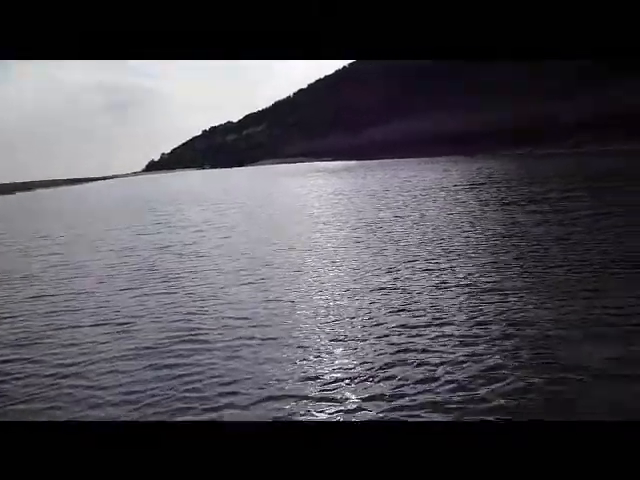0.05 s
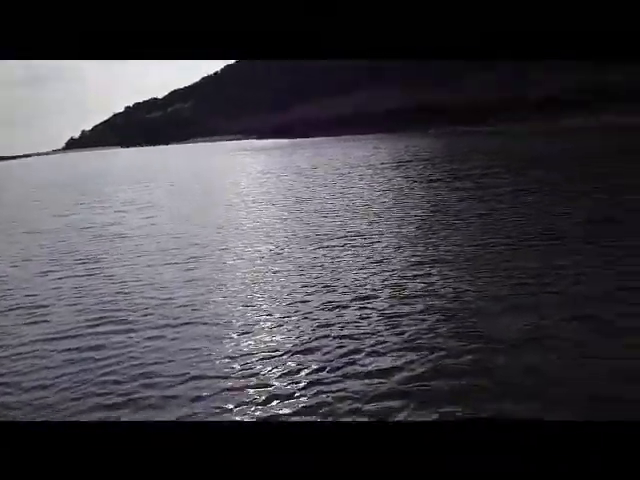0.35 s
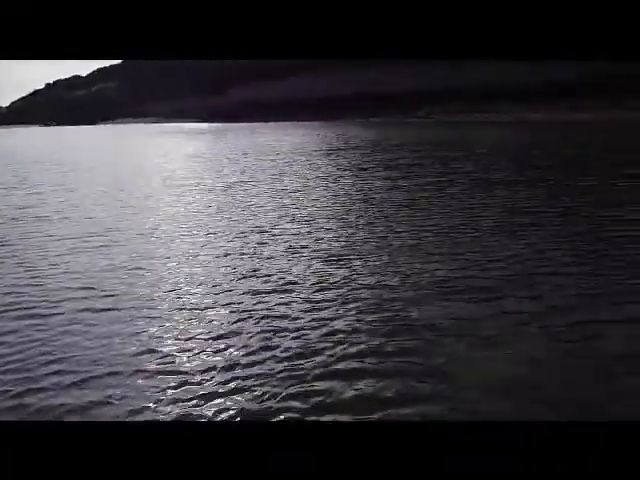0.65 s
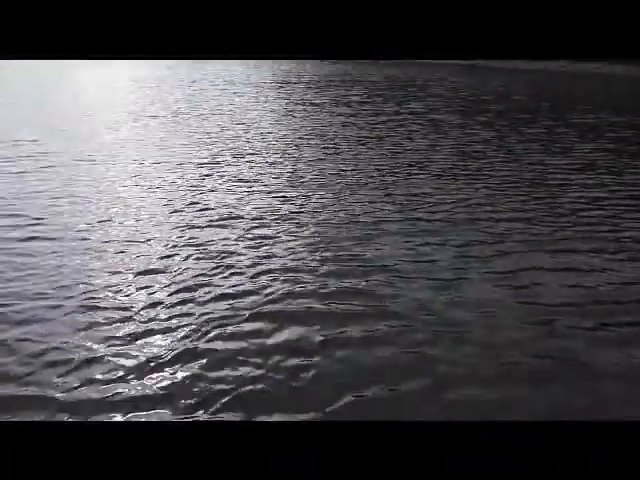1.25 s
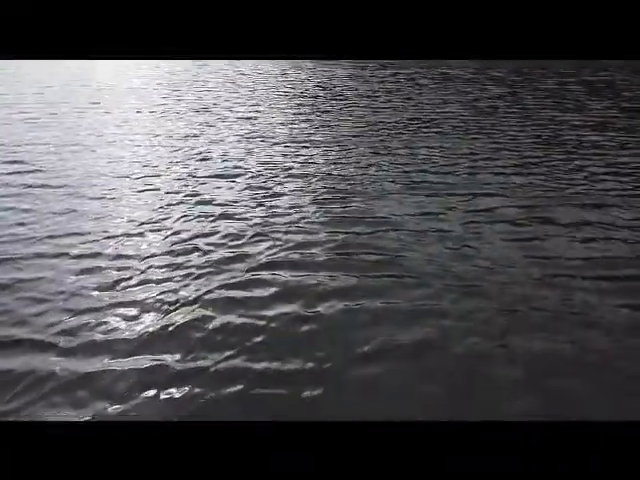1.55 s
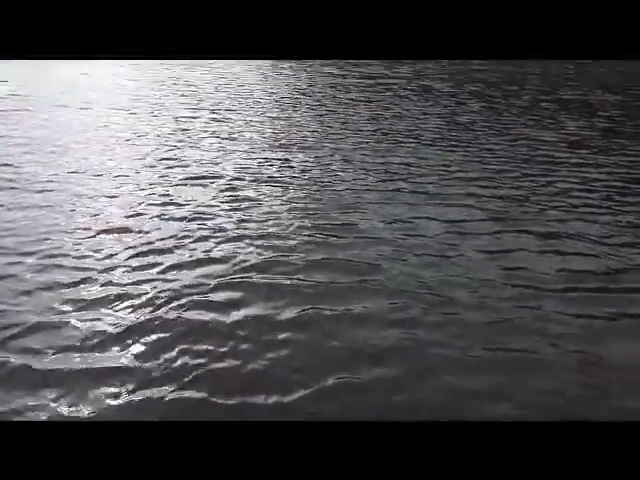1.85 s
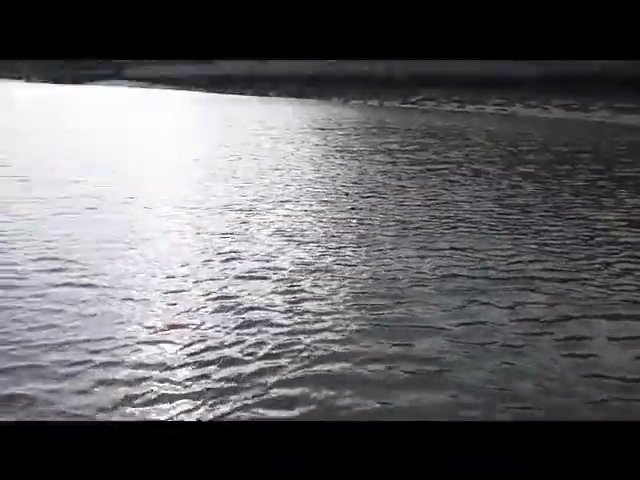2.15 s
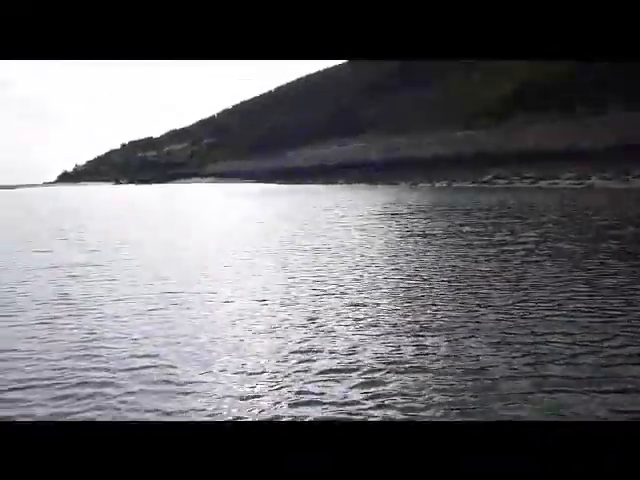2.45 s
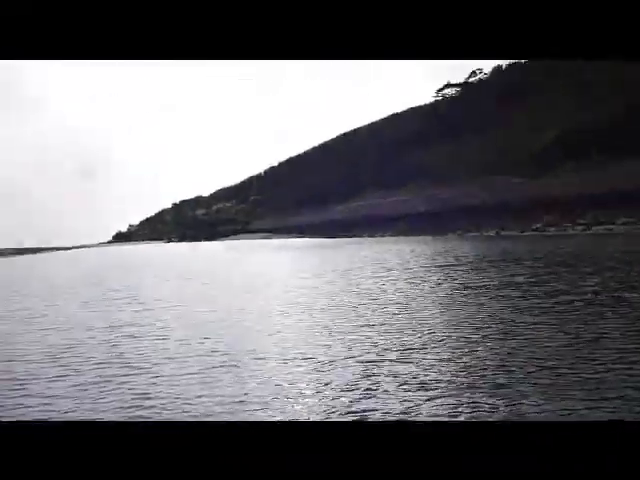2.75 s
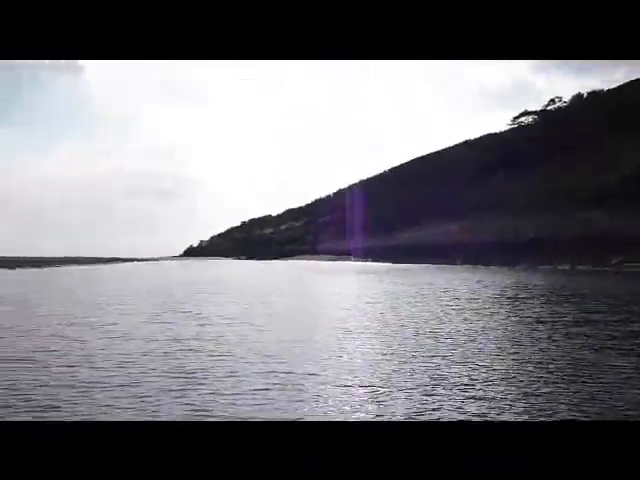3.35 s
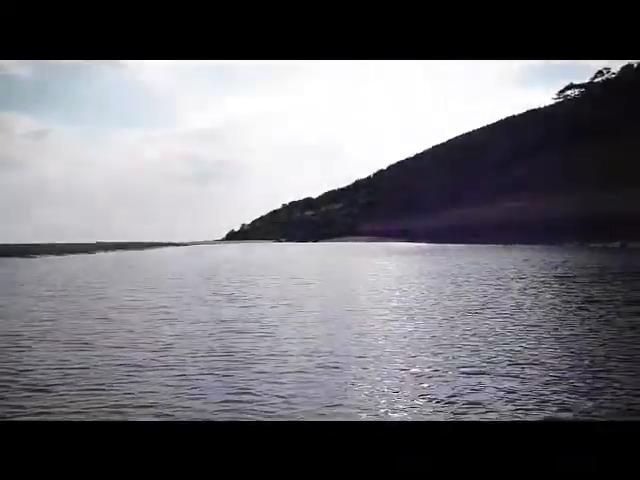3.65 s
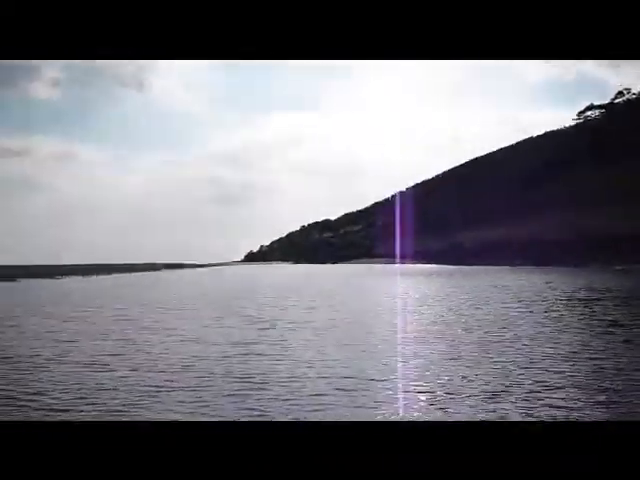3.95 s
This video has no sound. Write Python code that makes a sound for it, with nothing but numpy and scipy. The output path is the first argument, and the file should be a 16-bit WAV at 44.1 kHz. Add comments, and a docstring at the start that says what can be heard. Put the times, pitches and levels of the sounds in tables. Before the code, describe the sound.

A gull yelps hoarsely twice at the start, over softly rushing water and faint ripples. A loud, hollow knock rings through a boat's hull at 0.8 seconds, with softer ones near 2.3 and 3.5. The gull gives falling cries at about 1.7 and 3.1 seconds, each ending in a croak and echoing faintly. Wind puffs bump the microphone on and off, and a small plop comes near 3.7.

```python
"""A gull over a wide river, heard from a small boat: two hoarse yelps, then two long falling cries.
Its harmonics slide through throat resonances; each cry starts hoarse and ends in a croak.
The hillside returns a faint echo of the bird. Knocks set the hollow hull ringing, small ticks sound,
and puffs of air bump the microphone. Water rushes all around, ripples trap ringing bubbles,
and a faint low hum fades away."""
import sys
import numpy as np
from scipy import signal
from scipy.fft import rfft, irfft, next_fast_len
from scipy.io import wavfile
from scipy.ndimage import uniform_filter1d, map_coordinates

SR = 44100
rng = np.random.default_rng(int(sys.argv[2]) if len(sys.argv) > 2 else 0)


def waveform_to_disk(signal):
    """Save audio, clipped to [-1, 1], as 16-bit WAV at the path in sys.argv[1]."""
    frames = np.transpose(np.atleast_2d(signal))
    scaled = np.clip(frames, -1, 1) * 32767
    samples = np.round(scaled).astype(np.int16)
    wavfile.write(sys.argv[1], SR, samples)


N = 176400
TIME_S = np.arange(N) / SR


def amp(db):
    return 10 ** (np.asarray(db) / 20)


def unit_rms(x):
    return x / np.sqrt(np.mean(x ** 2) + 1e-20)


def at_hz(points, hz):
    """Interpolate (frequency, value) points on a log axis."""
    freqs, values = np.transpose(points)
    return np.interp(np.log(hz + 1), np.log(freqs + 1), values)


def curves(rows):
    """One value per sample for each column after the time."""
    times, *columns = np.transpose(rows)
    return [np.interp(TIME_S, times, column) for column in columns]


def wobble(rate_hz, size=N):
    """Smooth random curve, rate_hz knots a second."""
    knots = rng.standard_normal(int(size * rate_hz / SR) + 4)
    return map_coordinates(knots, [np.arange(size) * rate_hz / SR])


def wavering_phase(hz, depth, rate_hz, size=N):
    """Running phase of a pitch with random relative deviation."""
    return 2 * np.pi * np.cumsum(hz * (1 + depth * wobble(rate_hz, size))) / SR


def noise(spectrum, size=N):
    """Coloured noise, rms 1."""
    n_fft = next_fast_len(size + 8192)
    gain = amp(at_hz(spectrum, np.fft.rfftfreq(n_fft, 1 / SR)))
    return unit_rms(irfft(rfft(rng.standard_normal(n_fft)) * gain, n_fft)[:size])


def snap(spectrum, t60_s):
    """Short decaying noise burst."""
    t = np.arange(SR // 10) / SR
    return noise(spectrum, len(t)) * amp(-60 * t / t60_s)


def gate(rows, fade_s):
    """1 from the first row's time to the last, with fades centred on both."""
    inside_s = np.minimum(TIME_S - rows[0][0], rows[-1][0] - TIME_S)
    return np.sin(np.pi / 2 * np.clip(inside_s / fade_s + .5, 0, 1)) ** 2


def add(out, start_s, x):
    i = max(round(start_s * SR), 0)
    out[i:i + len(x)] += x[:N - i]


# Water rush (frequency [Hz], gain [dB])
RUSH_SPECTRUM = [(25, -5), (60, 3.5), (95, -3), (220, -6.5), (400, -15), (900, -13), (1400, -18),
                 (2000, -25), (3000, -30.5), (6500, -35.5), (8000, -47.5)]
# Rush envelope (time [s], level [dB])
RUSH_ENVELOPE = [(0, -46.5), (1.3, -49), (2.6, -47.5), (3.0, -49), (4, -47.5)]
# Fine hiss (frequency [Hz], gain [dB])
HISS_SPECTRUM = [(800, -16), (2500, -2), (4000, -7), (6000, -2.5), (8000, -17)]
# Hiss swells (centre [s], level [dB], half width [s])
HISS_SWELLS = [(0.591, -60.5, 0.098), (1.99, -59.5, 0.17), (3.95, -65.5, 0.2)]


def river(patch_db=2.5, hollow_hz=942, hollow_width_hz=180, hollow_db=-11):
    """Open water rushes in shifting patches, with a wandering resonance and swells of hiss."""
    bins = signal.stft(noise(RUSH_SPECTRUM), nperseg=512)[2]
    patches = uniform_filter1d(rng.standard_normal(bins.shape), size=4, axis=0)
    patches = unit_rms(uniform_filter1d(patches, size=10, axis=1))
    rush = unit_rms(signal.istft(bins * amp(patch_db * patches), nperseg=512)[1][:N])
    phase = 2 * np.pi * np.cumsum(hollow_hz * np.exp(.08 * wobble(8.2))) / SR
    hollow = unit_rms(wobble(hollow_width_hz) * np.cos(phase) + wobble(hollow_width_hz) * np.sin(phase))
    water = (rush + amp(hollow_db) * hollow) * amp(curves(RUSH_ENVELOPE)[0])
    swells = sum(amp(db) * np.exp(-.5 * ((TIME_S - centre_s) / width_s) ** 2)
                 for centre_s, db, width_s in HISS_SWELLS)
    return water + noise(HISS_SPECTRUM) * swells


# Hum envelope (time [s], level [dB])
HUM_ENVELOPE = [(.8, -53), (1.3, -65), (2, -86)]


def hum(hz=133):
    """A wavering low sine fades away."""
    phase = wavering_phase(hz, depth=.011, rate_hz=7.7)
    return np.sqrt(2) * np.sin(phase) * amp(curves(HUM_ENVELOPE)[0])


# Two yelps, two cry onsets; a list each (time [s], pitch [Hz], level [dB], roughness [0-1])
YELPS_AND_ONSETS = [
    [(.018, 396.5, -49.5, .5), (.032, 429.7, -31, 0.3), (.04, 438, -45, .3), (.045, 502, -41.5, 0.1),
     (.056, 507, -37, 0.14), (.072, 468, -49, 0.4), (.097, 405, -51, 0.65)],
    [(.213, 405, -43.5, 0.76), (.229, 450.6, -37.5, .3), (.243, 487.3, -37.5, 0.14),
     (.259, 480, -36.5, 0.2), (.274, 418, -50.5, .5), (.286, 383, -47, .7)],
    [(1.684, 474.7, -55, 0.8), (1.702, 542.5, -44.5, 0.37), (1.712, 615, -43.5, 0.37),
     (1.739, 640, -48, 0.88)],
    [(3.1, 526, -55, 0.7), (3.117, 587, -46.5, 0.25), (3.144, 597, -44.5, 0.77)],
]
# Open throat (frequency [Hz], gain [dB])
THROAT_OPEN = [(300, -30), (650, -10.5), (950, -6.5), (1280, -0.5), (1480, -11.5), (1760, -1.5), (1930, 0),
               (2600, -8), (2850, -19), (3480, -8), (3750, -18.5), (8000, -39.5)]
# Croak ending each cry; a list each (time [s], pitch [Hz], level [dB], roughness [0-1])
END_CROAKS = [
    [(1.884, 358, -46, 0.98), (1.936, 311, -48.5, 0.35)],
    [(3.346, 340, -41, 0.49), (3.388, 316, -46, 0.77)],
]
# Half-shut throat (frequency [Hz], gain [dB])
THROAT_HALF_SHUT = [(300, -27), (700, -1.5), (1000, 12), (1350, 0.5), (7500, -46)]


def gull_hoarse():
    """The voice breaks into a low register: the throat shapes rich harmonics and pulsing noise."""
    out = np.zeros(N)
    for notes, throat in [(YELPS_AND_ONSETS, THROAT_OPEN), (END_CROAKS, THROAT_HALF_SHUT)]:
        for rows in notes:
            edges = gate(rows, fade_s=.008)
            on = edges > 0
            hz, db, rough = (curve[on] for curve in curves(rows))
            phase = wavering_phase(hz, depth=.008, rate_hz=400, size=len(hz))
            gains = amp([at_hz(throat, k * hz) for k in range(1, 18)])
            tone = sum(gain * np.sin(k * phase + rng.uniform(0, 2 * np.pi))
                       for k, gain in enumerate(gains, 1))
            tone = unit_rms(tone / np.linalg.norm(gains, axis=0))
            rasp = unit_rms(noise(throat, len(hz)) * (1 + np.cos(phase)))
            out[on] += (np.sqrt(1 - rough ** 2) * tone + rough * rasp) * amp(db) * edges[on]
    return out


def valley(direct, reflection_db=-25.5, blur_hz=264.6):
    """Direct sound, scatter off the water and a late echo from the hill."""
    t, out = np.arange(SR) / SR, direct.copy()
    blurred = direct * unit_rms(wobble(blur_hz))  # moving air and water blur the echo's pitch
    for sound, delay_s, t60_s in [(direct, .01, .94), (blurred, .28, 1.2)]:
        tail = rng.standard_normal(SR) * amp(-60 * t / t60_s)
        add(out, delay_s, amp(reflection_db) * signal.fftconvolve(sound, tail / np.linalg.norm(tail)))
    return out


# Air puffs on the microphone (centre [s], level [dB], pitch [Hz])
AIR_PUFFS = [(0.098, -29, 159), (0.115, -25.5, 176), (.132, -33, 119), (0.173, -36, 114),
             (0.441, -35.5, 186), (0.529, -35, 169), (1.393, -35.5, 131), (1.506, -24.5, 124.6),
             (1.555, -17, 146), (1.571, -31.5, 169), (1.896, -17, 160), (1.911, -21.5, 116),
             (2.429, -25.5, 140), (2.448, -26.5, 122), (2.472, -20.5, 138), (2.512, -24.5, 240),
             (2.533, -23.5, 181), (3.429, -22.5, 182), (3.535, -33, 113)]
# Turbulence (frequency [Hz], gain [dB])
WAKE_SPECTRUM = [(25, -21), (80, 5.5), (220, 5.5), (400, -4), (4000, -88)]


def air_puffs(width_cycles=.33, wake_stretch=3.9, wake_gain=.49):
    """Each eddy is a low pressure swing of one or two cycles inside longer turbulence."""
    out, n = np.zeros(N), SR // 6
    t = (np.arange(n) - n / 2) / SR
    for centre_s, db, hz in AIR_PUFFS:
        widths = t * hz / width_cycles
        bell = 1 / np.cosh(widths)
        swing = unit_rms(bell * np.sin(2 * np.pi * (hz * t + rng.random())))
        wake = unit_rms(np.exp(-.5 * (widths / wake_stretch) ** 2) * noise(WAKE_SPECTRUM, n))
        puff = unit_rms(swing + wake_gain * wake) * np.sqrt(np.mean(bell ** 2))
        add(out, centre_s + t[0], amp(db) * puff)
    return out


def bubble(hz, db, life_cycles=6.9, rise=.041):
    """One bubble rings briefly and rises in pitch."""
    cycles = hz * np.arange(SR // 10) / SR
    age = cycles / life_cycles
    phase = 2 * np.pi * cycles * (1 + rise * np.tanh(age / 2))
    return amp(db) * np.sin(phase) * np.tanh(cycles) * np.exp(-2 * age)


def ripples(count=36, median_hz=1465, log_spread=.83, median_db=-65):
    """Ripples trap small bubbles, the smaller the fainter; a larger one plops beside the boat."""
    out = np.zeros(N)
    starts_s = rng.uniform(0, N / SR, count)
    for start_s, (pitch_draw, level_draw) in zip(starts_s, rng.standard_normal((count, 2))):
        hz = median_hz * np.exp(log_spread * np.clip(pitch_draw, -2, 2))
        add(out, start_s, bubble(hz, median_db + 2 * level_draw) * np.sqrt(median_hz / hz))
    add(out, 3.668, bubble(hz=390, db=-39.5))
    return out


# Small ticks: a lone one, then one leading into the first hull knock (time [s], level [dB])
TICK_HITS = [(0.73, -43.5), (0.842, -41.5)]
# Tick noise (frequency [Hz], gain [dB])
TICK_SPECTRUM = [(500, 6.5), (3500, -3), (5300, 3), (8000, -5)]


def ticks():
    """Each tick is a faint, bright burst."""
    out = np.zeros(N)
    for start_s, db in TICK_HITS:
        add(out, start_s, amp(db) * snap(TICK_SPECTRUM, t60_s=.028))
    return out


# Hull knocks (time [s], thud level [dB], sustain [ratio], crack level [dB])
HULL_KNOCKS = [(0.8448, -21, 1, -30), (2.335, -29.5, 0.82, -42.5), (2.3474, -40, 0.64, -60),
               (3.473, -32.5, 0.58, -55)]
# Hull modes (frequency [Hz], gain [dB], T60 at sustain 1 [s])
HULL_MODES = [(163.6, -16, 1.84), (234, -14.5, 1.3), (295.3, -9, 1.3), (324.4, -5, 0.96), (342.5, -7, 0.8),
              (585, 0.5, 0.27), (618, -5.5, 0.35), (695, -2.5, 0.32), (1293, -5.5, 0.13),
              (5180, -19, 0.059)]
# Thud noise (frequency [Hz], gain [dB])
THUD_SPECTRUM = [(50, -38), (150, 5), (300, 1.5), (700, -7), (1300, 3.5), (1800, -1.5), (2600, -19.5),
                 (8000, -44)]
# Thud decay (frequency [Hz], T60 at sustain 1 [s])
THUD_DECAY = [(150, 0.43), (330, 0.6), (700, 0.35), (1300, 0.062), (2500, 0.06), (7000, 0.02)]
# Crack noise (frequency [Hz], gain [dB])
CRACK_SPECTRUM = [(200, -15), (1000, -3), (2500, 10.5), (5300, 2.5), (8000, -7)]


def hull_knocks(push_hz=927, push_db=3.5, push_t60_s=.015, ring_db=-5, attack_s=.0023, crack_lag_s=.003):
    """Each knock gives a push, a crack, a dense thud whose treble dies first, and the hull's ring."""
    out, t = np.zeros(N), np.arange(SR) / SR
    for start_s, thud_db, sustain, crack_db in HULL_KNOCKS:
        bin_hz, age_s, bins = signal.stft(noise(THUD_SPECTRUM, SR), SR, nperseg=256)
        bin_t60_s = sustain * at_hz(THUD_DECAY, bin_hz)[:, None]
        thud = signal.istft(bins * amp(-60 * age_s / bin_t60_s), SR, nperseg=256)[1][:SR]
        ring = np.zeros(SR)
        for hz, db, t60_s in HULL_MODES:
            decay = amp(db + rng.normal() - 60 * t / (sustain * t60_s))
            ring += decay * np.sin(2 * np.pi * (hz * t + rng.random()) + wobble(35, SR))
        push = amp(push_db - 60 * t / push_t60_s) * np.sin(2 * np.pi * push_hz * t)
        body = (thud + sustain * amp(ring_db) * ring) * (1 - np.exp(-t / attack_s))
        add(out, start_s, amp(thud_db) * (push + body))
        add(out, start_s + crack_lag_s, amp(crack_db) * snap(CRACK_SPECTRUM, t60_s=.012))
    return out


# First cry, clear part (time [s], pitch [Hz], level [dB])
FIRST_CRY = [(1.716, 1866, -44.5), (1.738, 1831, -34), (1.768, 1718, -39), (1.79, 1657, -34),
             (1.826, 1620, -38), (1.858, 1500, -44.5), (1.878, 1450, -48)]
# Second cry, clear part (time [s], pitch [Hz], level [dB])
SECOND_CRY = [(3.139, 1784, -40), (3.154, 1787, -44), (3.2, 1658, -40), (3.255, 1576, -35.5),
              (3.306, 1430, -46), (3.337, 1306, -41.5), (3.346, 1260, -50)]
# Throat in the clear cries (frequency [Hz], gain [dB])
THROAT_CLEAR = [(1900, 1.5), (2600, -30), (2950, -7), (3080, -13.5), (3230, 0.5), (3620, 2.5), (3900, -25),
                (4500, -19.5), (4700, -37), (4950, -10), (5300, -10), (5600, -22.5), (6100, -20),
                (7200, -35.5)]


def gull_cry(rows, treble_db=0, beak_loss_db=24, overtone_flutter_db=3.7, flutter_db=1.16):
    """A clear falling tone; harmonics swell and dip as they slide through the throat's resonances."""
    hz, db = curves(rows)
    phase = wavering_phase(hz, depth=.0033, rate_hz=350)
    beak_closure = np.interp(TIME_S, [rows[0][0], rows[-1][0]], [0, 1]) ** 10
    tone = np.zeros(N)
    for k in range(1, 6):
        gain_db = at_hz(THROAT_CLEAR, k * hz)
        gain_db += (k >= 4) * (treble_db - beak_loss_db * beak_closure)
        gain_db += (k > 1) * overtone_flutter_db * wobble(70)
        tone += amp(gain_db) * np.sin(k * phase)
    return np.sqrt(2) * tone * amp(db + flutter_db * wobble(300)) * gate(rows, fade_s=.0072)


def scene():
    """Bird, boat, air and water at one microphone."""
    gull = gull_hoarse() + gull_cry(FIRST_CRY, treble_db=-10) + gull_cry(SECOND_CRY)
    return (valley(gull) + hull_knocks() + ticks() + air_puffs() + river() + ripples() + hum())[None]


def record(dry):
    """Steep low-pass at the band limit."""
    cutoff_hz = 7900
    n_fft = next_fast_len(N + SR // 2)
    hz = np.fft.rfftfreq(n_fft, 1 / SR)
    return irfft(rfft(dry, n_fft) / np.sqrt(1 + (hz / cutoff_hz) ** 110), n_fft)[..., :N]


dry = scene()
out = record(dry)
waveform_to_disk(out)
```